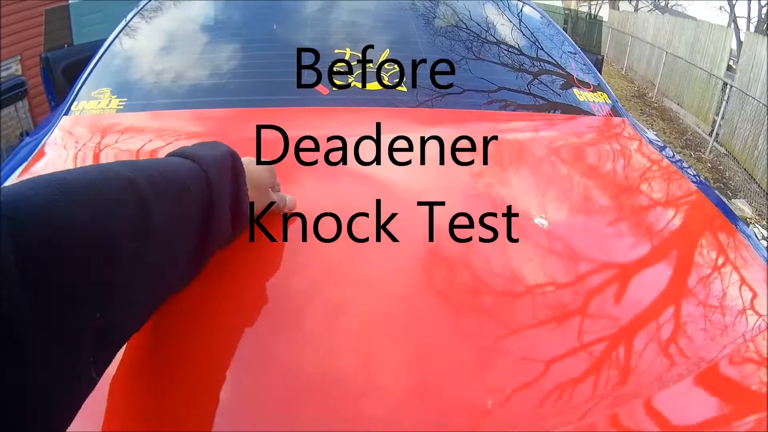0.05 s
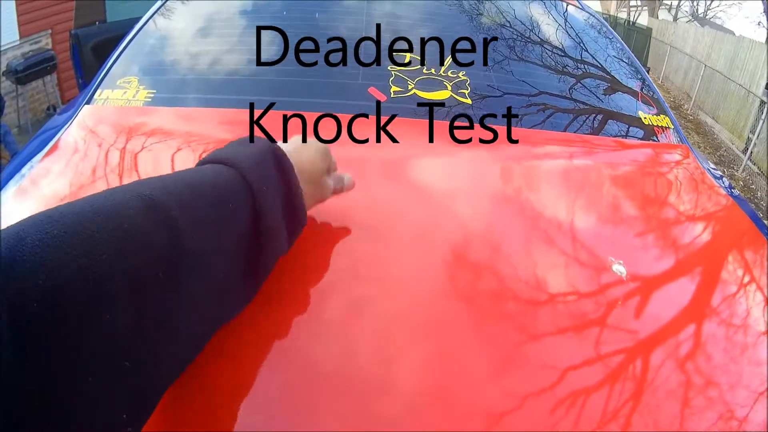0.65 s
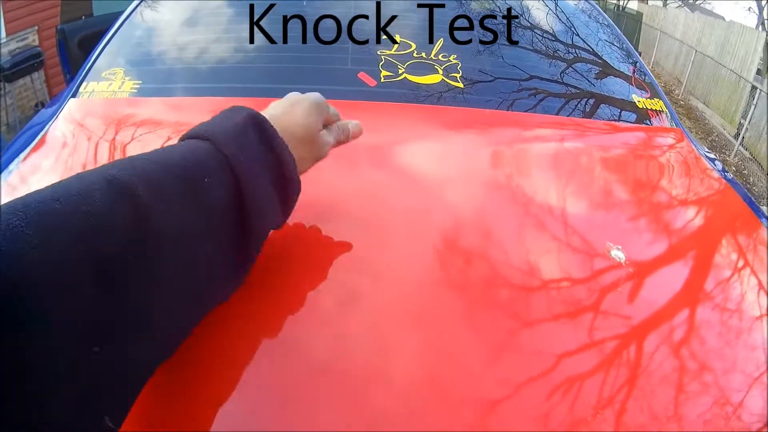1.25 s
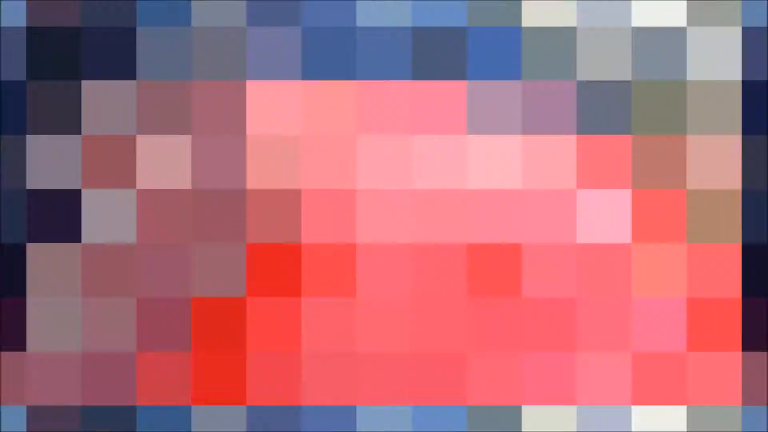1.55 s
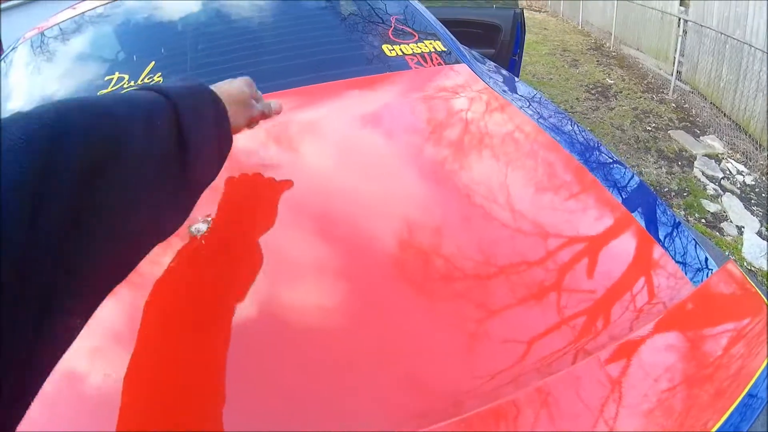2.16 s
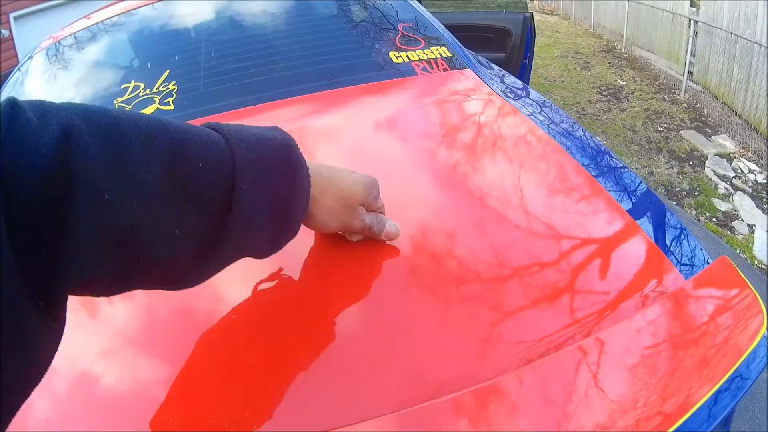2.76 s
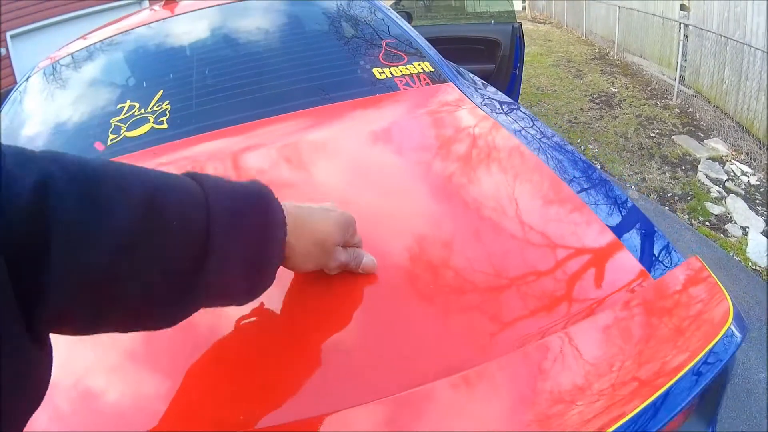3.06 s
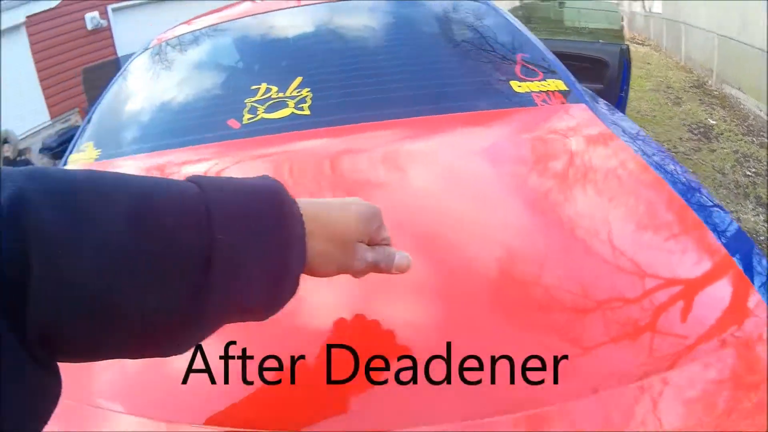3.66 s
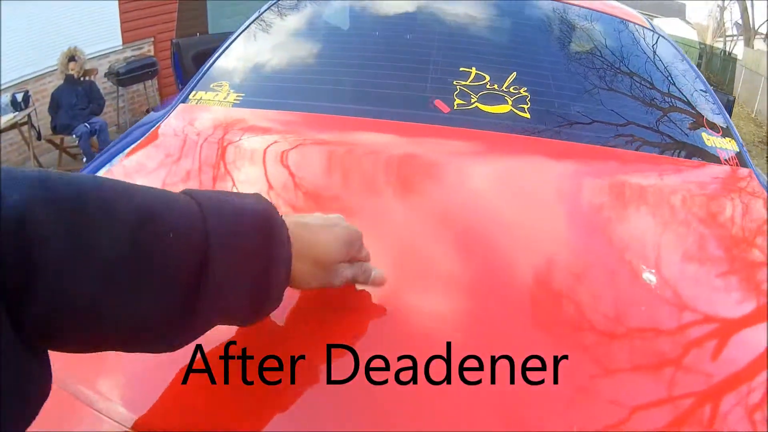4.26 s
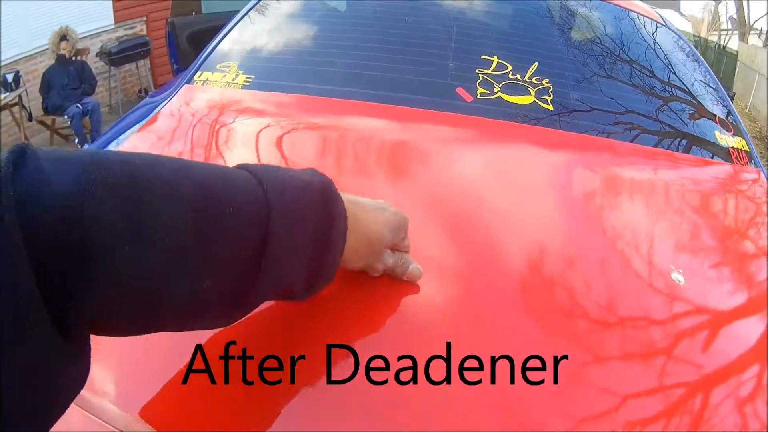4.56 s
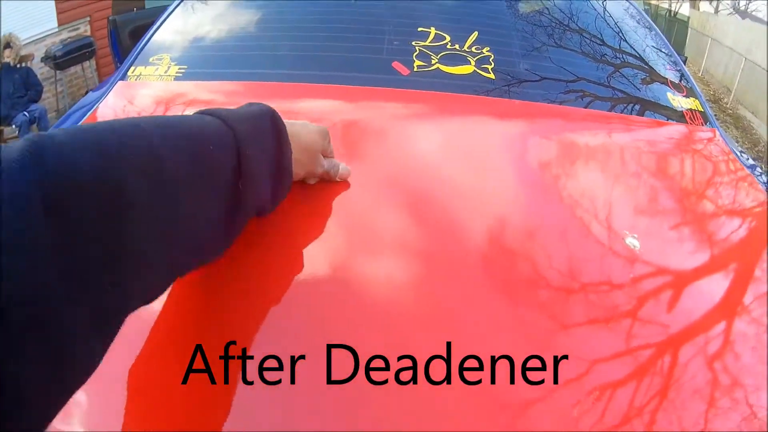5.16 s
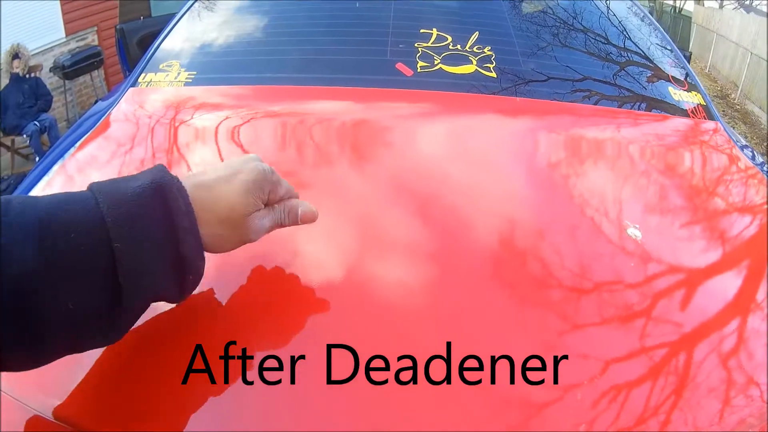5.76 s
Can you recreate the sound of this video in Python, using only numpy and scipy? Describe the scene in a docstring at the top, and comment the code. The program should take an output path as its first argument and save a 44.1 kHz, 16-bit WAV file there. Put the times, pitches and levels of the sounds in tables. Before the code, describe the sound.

Knuckles rap close up on the sheet-metal trunk lid of a parked car. Eight quick, even knocks boom with a short hollow ring. Eleven slower knocks follow on the now padded lid, ringing a little shorter, the last few softer, some with a light click on the paint. Far behind, small birds chirp over a low outdoor hum and soft hiss.

```python
"""Knuckles rap on the sheet-metal boot lid of a parked car, close up and outdoors.
Each knock pushes the sheet, sets its modes ringing and ticks on the paint. Eight land on the bare lid;
then, lined with damping mat and ringing a little shorter, it takes five at the side and six in the middle.
Small birds chirp far off over a low outdoor hum and a soft hiss, and a small camera whines faintly."""
import sys
import numpy as np
from scipy import signal
from scipy.fft import rfft, irfft
from scipy.io import wavfile

SR = 44100
rng = np.random.default_rng(int(sys.argv[2]) if len(sys.argv) > 2 else 0)


def wav_record(signal):
    """Record a signal, one row per channel, as 16-bit PCM in the file named by sys.argv[1]."""
    frames = np.transpose(np.atleast_2d(signal))
    bounded = np.clip(frames, -1, 1)
    # unit amplitude maps onto the largest positive 16-bit level
    quanta = np.round(bounded * 32767).astype(np.int16)
    wavfile.write(sys.argv[1], SR, quanta)


N = 260233
LINED_S, MIDDLE_S = 1.757, 3.9  # the lid is lined from here on; the hand moves to its middle

# Tone of the outdoor bed while the lid is bare, and while it is lined: frequency_hz, relative_db
BED_BARE = [(20, 1), (120, 8), (250, -5), (500, -18), (900, -7.5), (1400, -8.5), (2200, -18), (3000, -25),
            (5000, -29), (9000, -31.5), (15000, -30), (16000, -40)]
BED_LINED = [(20, -2), (50, -0.5), (110, -9), (155, 0.5), (200, -4.5), (400, -13.5), (600, -16.5),
             (1400, -17), (1850, -23.5), (3000, -29.5), (4200, -29), (14300, -29.5), (16000, -43)]
# Partials of the camera's whine: pitch_hz, base_level_db
WHINE_PARTIALS = [(8495, -94), (8559, -93.5), (8624, -79.5), (8694, -88), (8759, -91)]
# Knuckle hits: start_s, strength_db, hardness_db (tilt per register), hollowness_db (lift of the body)
KNUCKLE_HITS = [(0.0578, -34, -0.5, 1), (0.306, -32.3, 0.5, 1.2), (0.5252, -31, 0.26, 0),
                (0.7439, -32, 0.3, 0.5), (0.9528, -35.5, -1.75, 0), (1.1617, -29.5, 0.05, -3.5),
                (1.387, -30, 1.2, 1.5), (1.6055, -31.1, 0.1, 1), (1.9657, -35.6, 0.5, -2),
                (2.2869, -36.5, -1.65, -2.5), (2.7394, -31.5, 0.2, -1.3), (3.0909, -30, 0.5, 3),
                (3.4114, -32, 1.4, 4), (4.1694, -35, 2.5, -1.2), (4.482, -35, 0, -1),
                (4.842, -37.5, -2, -0.2), (5.141, -37.5, -1, 4), (5.4578, -38.5, -1, 1),
                (5.7278, -39, 0, -6)]
# Bounds of the lid's five registers (boom, body, ring, clack, snap): edge_hz
REGISTER_EDGES_HZ = [20, 200, 450, 950, 1750, 5000]
# Low modes of the lid, weighted by spot: pitch_hz, bare_t60_s, bare_db, lined_side_db, lined_middle_db
LOW_MODES = [(32, 0.29, -9, -17, 1.5), (44.5, 0.36, -17, -6, -23), (65, 0.31, -12, -8, -8),
             (87.8, 0.27, -4, 1.5, 1.5), (102.5, 0.48, -15.5, -9, -6.5), (109.9, 0.33, 0, -4.5, -20),
             (121.15, 0.32, 0, -3.5, -1), (141.6, 0.36, -14, -13, -7), (155.4, 0.41, -6, -2, -5.5),
             (171.1, 0.36, -6.5, -19, -3), (194.7, 0.43, -16, -11.5, -13.5), (208.3, 0.28, -5.5, -2, -4.5),
             (232.3, 0.32, -2.5, 0, -2.5), (247.9, 0.34, -7.5, -20, -8.5), (264.5, 0.34, -6, -1.5, -5),
             (285.1, 0.34, -5.5, -8.5, -11), (301.8, 0.27, -0.5, 2, -3.5), (317.3, 0.11, 9, 2, 6.5),
             (333.7, 0.29, -11.5, 1.5, 0.5), (351.9, 0.27, -2.5, -6.5, -6), (387.2, 0.21, -8, 2.5, -5),
             (417.3, 0.23, -4, -1.5, -4), (446, 0.2, -4.5, -16, -25)]
# Contour of the thin sheet's crowded high modes: pitch_hz, weight_db, bare_t60_s
HIGH_MODE_CONTOUR = [(424, -1, 0.24), (568, 2, 0.19), (794, -2.5, 0.14), (984, -8.5, 0.17),
                     (1306, -2.5, 0.1), (1774, -13.5, .11), (1710, -16, 0.085), (2230, -13.5, 0.087),
                     (2850, -31.5, 0.068), (3400, -34, 0.072), (5000, -38.5, 0.054)]
# How the damping mat shortens the ring: low_t60_factor, high_t60_factor
MAT_DAMPING = [0.84, 0.94]
# Voicing of each spot (bare, lined side, lined middle): boom_db, body_db, ring_db, clack_db, snap_db
SPOT_VOICING = [(3, 5, -0.9, -9.5, -27), (-0.2, 4, -0.6, -9, -22), (0.8, 4.5, -0.95, -12.5, -31)]
# Lift of the first push over the hit's strength: bare_db, lined_side_db, lined_middle_db
PUSH_LIFT_DB = [17, 16.5, 17]
# Louder clicks on the paint, two as knocks land and four from cuff or fingernail just after a knock: start_s,
# level_db
EXTRA_CLICKS = [(3.092, -54), (3.414, -53), (4.509, -53), (4.867, -48), (5.163, -57.5), (5.474, -54)]
# Tone of the ticks and clicks: frequency_hz, relative_db
TICK_TONE = [(1800, -3), (3000, -10.5), (4500, -0.5), (7000, 0.5), (9000, -6.5), (12500, -1.5), (15000, 1),
             (16000, -7.5)]
# Chirps that drop quickly, then flatten: start_s, length_s, start_hz, end_hz, source_level_db
BIRD_CHIRPS = [(0.14, .07, 4200, 3440, -71.5), (0.232, .08, 4810, 3620, -68.5),
               (0.784, .07, 4500, 3770, -76), (1.47, .12, 5400, 4000, -67.5),
               (1.938, 0.11, 4600, 3400, -68), (3.219, 0.096, 5100, 3060, -69),
               (3.7, 0.059, 3940, 3450, -78), (4.091, .11, 4400, 3050, -72), (4.809, .11, 4650, 3400, -71),
               (5.531, .08, 4500, 2950, -69.5)]
# Thin whistles that glide straight: start_s, length_s, start_hz, end_hz, source_level_db
BIRD_WHISTLES = [(0.25, .13, 4650, 4450, -73), (0.399, .014, 5740, 7200, -63.5),
                 (1.05, .012, 7400, 6200, -69.5), (1.49, .09, 3900, 3750, -70.5),
                 (1.656, 0.013, 5130, 7000, -64), (1.815, 0.18, 7670, 6200, -81),
                 (2.4, .28, 4130, 4300, -87), (2.58, .09, 8060, 7800, -80), (2.696, .15, 8950, 8800, -80),
                 (2.8, .04, 4420, 4320, -76.5), (3.48, .16, 6060, 7500, -74.5)]


def gain_of(db):
    """Turns decibels into an amplitude factor."""
    return 10 ** (np.asarray(db) / 20)


def unit_rms(x):
    """Scales to rms 1."""
    return x / np.sqrt(np.mean(x ** 2) + 1e-20)


def curve_at(points, hz, column=1):
    """Reads one column of a spectrum table on a log-frequency axis."""
    table = np.transpose(points)
    return np.interp(np.log(hz + 1), np.log(table[0] + 1), table[column])


def add(mix, start_s, sound):
    """Mixes a sound in at start_s."""
    part = mix[max(round(start_s * SR), 0):][:len(sound)]
    part += sound[:len(part)]


def noise(tone):
    """Noise of rms 1 with the given spectrum."""
    gains = gain_of(curve_at(tone, np.fft.rfftfreq(N, 1 / SR)))
    return unit_rms(irfft(rfft(rng.standard_normal(N)) * gains, N))


def drift(hz):
    """Random wander of rms 1, moving at rates up to about hz."""
    lowpass = np.exp(-(np.fft.rfftfreq(N, 1 / SR) / hz) ** 2)
    return unit_rms(irfft(rfft(rng.standard_normal(N)) * lowpass, N))


def outdoor_bed(swell_db=2.5, crossover_hz=3000, surge_start_s=1.945, surge_every_s=1.0, surge_s=0.206):
    """Distant wavering hum and microphone hiss; at 1.76 s both drop, and the hiss then pulses."""
    t = np.arange(N) / SR
    air = np.where(t < LINED_S, gain_of(-55.5) * noise(BED_BARE), gain_of(-60) * noise(BED_LINED))
    hum = signal.sosfiltfilt(signal.butter(2, crossover_hz, fs=SR, output="sos"), air)
    hiss = air - hum
    surging = (t - surge_start_s) % surge_every_s < surge_s
    hiss_trim_db = np.where(t < LINED_S, 2, -4 + 3 * surging)
    return hum * gain_of(swell_db * drift(18)) + hiss * gain_of(hiss_trim_db)


def camera_whine(swell_db=6, lag_s=0.092, width_s=0.052):
    """A thin, flickering electronic whine that swells briefly after each knock."""
    t = np.arange(N) / SR
    partials = sum(gain_of(db) * np.sqrt(2) * np.sin(2 * np.pi * (hz * t + rng.random()))
                   for hz, db in WHINE_PARTIALS)
    swell = sum(np.exp(-((t - hit[0] - lag_s) / width_s) ** 2) for hit in KNUCKLE_HITS)
    trim_db = np.where(t < LINED_S, -0.5, -6)
    return partials * gain_of(trim_db + swell_db * swell + drift(18))


def lid_modes(spot, count=260):
    """Pitch, weight and ring time of the modes at one spot: a few low ones, then a crowd of high ones."""
    low = np.transpose(LOW_MODES)
    low_factor, high_factor = MAT_DAMPING if spot else (1, 1)
    bottom_hz, top_hz = REGISTER_EDGES_HZ[2], REGISTER_EDGES_HZ[-1]
    high_hz = bottom_hz * (top_hz / bottom_hz) ** ((np.arange(count) + rng.random(count)) / count)
    high_db = curve_at(HIGH_MODE_CONTOUR, high_hz)
    high_t60 = curve_at(HIGH_MODE_CONTOUR, high_hz, column=2) * high_factor
    high_t60 *= np.exp(0.18 * rng.standard_normal(count))
    return np.r_[low[0], high_hz], np.r_[low[2 + spot], high_db], np.r_[low[1] * low_factor, high_t60]


def sheet_push(t, width_s=0.00027, rebound_s=0.0014):
    """The sheet gives way under the knuckle: a short suction, then a weaker, slower rebound."""
    suction = np.exp(-(t / width_s - 1.65) ** 2) * (1 - np.exp(-(2 * t / width_s) ** 2))
    rebound = 0.2 * (t / rebound_s) ** 4 * np.exp(4 * (1 - t / rebound_s))
    return rebound - suction


def lid_knocks(scatter_hz=255, wander=0.044, detune=0.006, spread_db=3.5,
               rise_s=0.0011, boom_rise_s=0.0014, bite_s=0.0032):
    """Each knock pushes the sheet and sets its modes ringing; where it lands decides each mode's share."""
    out, t = np.zeros(N), np.arange(SR // 2) / SR
    spots = np.searchsorted([LINED_S, MIDDLE_S], [hit[0] for hit in KNUCKLE_HITS])
    for spot in range(3):
        hz, weight_db, t60 = lid_modes(spot)
        # the lowest modes start in step with the push; the higher, the more they scatter
        spot_phase = np.pi + hz / scatter_hz * rng.standard_normal(len(hz))
        decay = np.exp(-np.outer(np.log(1000) / t60, t))
        mode_register = np.searchsorted(REGISTER_EDGES_HZ[1:-1], hz)
        for start_s, strength_db, hardness_db, hollowness_db in np.array(KNUCKLE_HITS)[spots == spot]:
            hand_shift, weight_jitter, pressure = rng.standard_normal((3, len(hz)))
            # bending waves get shorter with pitch, so a small move of the hand changes high modes most
            phase = spot_phase + wander * np.sqrt(hz) * hand_shift
            pressed_hz = hz * (1 + detune * pressure)  # the hand's weight detunes the sheet
            modes = decay * np.cos(2 * np.pi * np.outer(pressed_hz, t) + phase[:, None])
            share = gain_of(weight_db + spread_db * weight_jitter)
            knock = gain_of(strength_db + PUSH_LIFT_DB[spot] + 0.6 * hardness_db) * sheet_push(t)
            for register, voicing_db in enumerate(SPOT_VOICING[spot]):
                tone = share[mode_register == register] @ modes[mode_register == register]
                # long waves build up slowly; short ones bite hardest before they spread over the sheet
                tone *= 1 - np.exp(-(t / (rise_s if register else boom_rise_s)) ** 2)
                tone *= 1 + 0.335 * register * np.exp(-t / bite_s)
                # a hard knuckle tilts the registers about the middle one; a hollow place lifts the body
                touch_db = hardness_db * (register - 2) + hollowness_db * (register == 1)
                knock += gain_of(strength_db + voicing_db + touch_db) * tone / np.std(tone[:SR // 20])
            add(out, start_s, knock)
    return out


def paint_ticks(decay_s=0.0025):
    """Skin, cuff or nail catches on the paint; every knock ticks faintly, harder ones more."""
    envelope, t = np.zeros(N), np.arange(SR // 20) / SR
    landings = [(start_s, strength_db - 30 + 2.5 * hardness_db)
                for start_s, strength_db, hardness_db, _ in KNUCKLE_HITS]
    for start_s, level_db in landings + EXTRA_CLICKS:
        add(envelope, start_s, gain_of(level_db) * np.exp(-t / decay_s))
    return envelope * noise(TICK_TONE)


def birds(warble_hz=42, warble_onset_s=0.03, echo_t60_s=0.42, echo_db=-4, direct_db=-2.5):
    """Far-off chirps and whistles that glide and warble, scattered by fences and walls."""
    song = np.zeros(N)
    wobble = np.sin(2 * np.pi * warble_hz * np.arange(N) / SR + drift(25)) + 0.698 * drift(70)
    for calls, bend, warble_depth in (BIRD_CHIRPS, 0.65, 0.085), (BIRD_WHISTLES, 1, 0.028):
        for start_s, length_s, start_hz, end_hz, level_db in calls:
            t = np.arange(int(length_s * SR)) / SR
            glide_hz = start_hz + (end_hz - start_hz) * (t / length_s) ** bend
            warble = warble_depth * np.minimum(t / warble_onset_s, 1) * wobble[int(start_s * SR):][:len(t)]
            phase = 2 * np.pi * np.cumsum(glide_hz * (1 + warble)) / SR
            call = np.sin(phase) * signal.windows.tukey(len(t), 0.3)
            add(song, start_s, gain_of(level_db) * unit_rms(call))
    t = np.arange(SR // 2) / SR
    tail = rng.standard_normal(len(t)) * np.exp(-np.log(1000) * t / echo_t60_s)
    echo = signal.fftconvolve(song, tail / np.linalg.norm(tail))[:N]
    return gain_of(direct_db) * song + gain_of(echo_db) * echo


def scene():
    """Mono mix: knocks and ticks up front, birds, bed and whine far beneath."""
    return (lid_knocks() + paint_ticks() + birds() + outdoor_bed() + camera_whine())[None]


def record(dry):
    """A steep low-pass trims the very top of the treble."""
    cutoff_hz = 15900
    lowpass = signal.firwin(511, cutoff_hz, window=("kaiser", 9), fs=SR)
    return signal.oaconvolve(dry, lowpass[None], "same")


dry = scene()
out = record(dry)
wav_record(out)
```